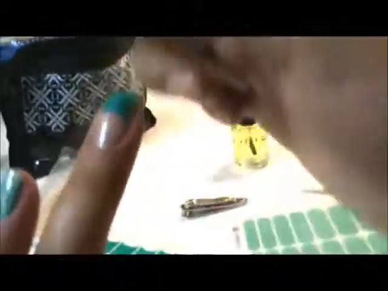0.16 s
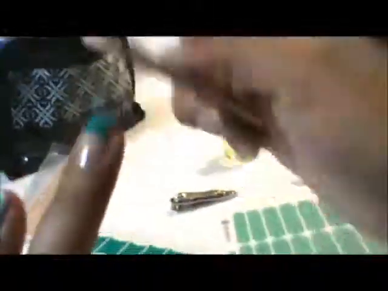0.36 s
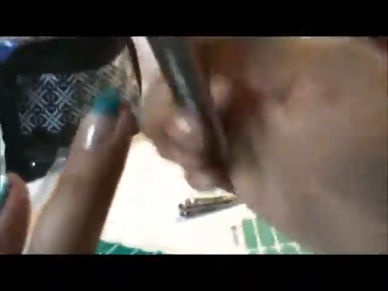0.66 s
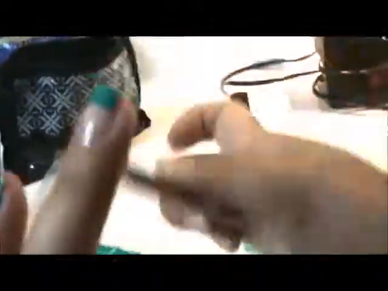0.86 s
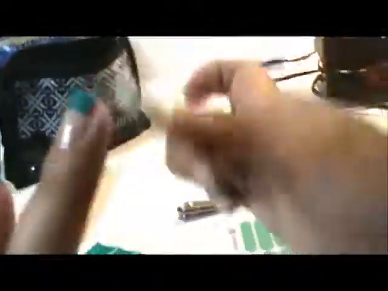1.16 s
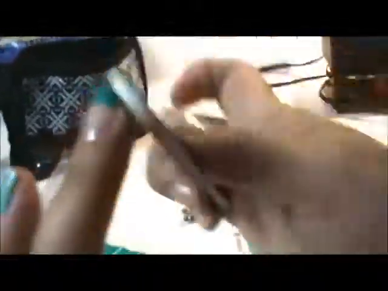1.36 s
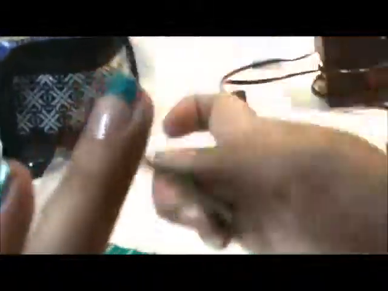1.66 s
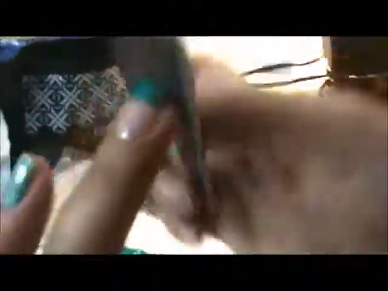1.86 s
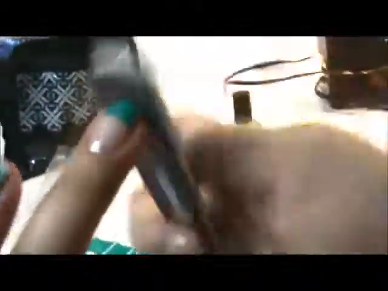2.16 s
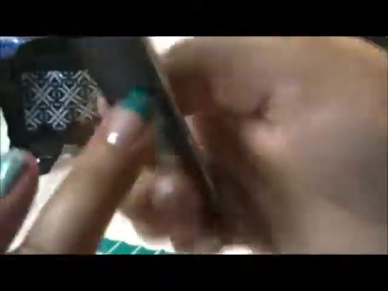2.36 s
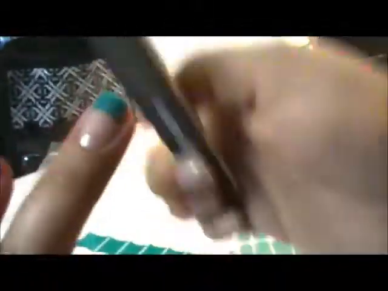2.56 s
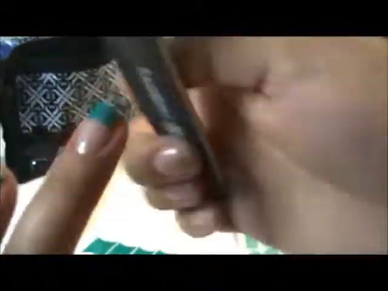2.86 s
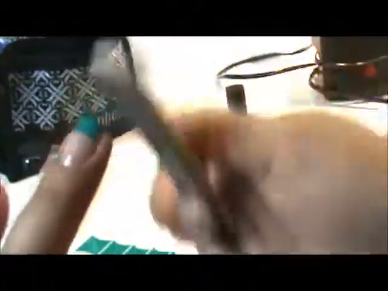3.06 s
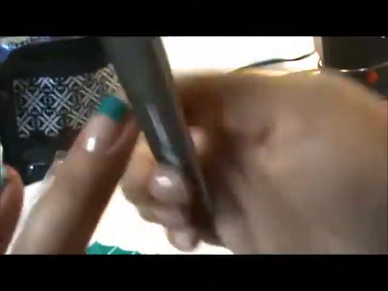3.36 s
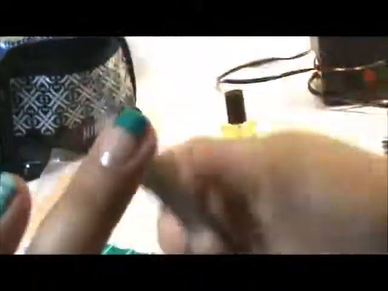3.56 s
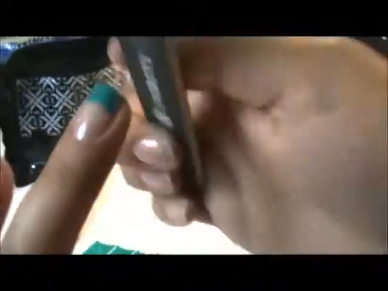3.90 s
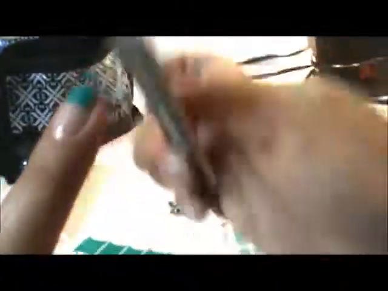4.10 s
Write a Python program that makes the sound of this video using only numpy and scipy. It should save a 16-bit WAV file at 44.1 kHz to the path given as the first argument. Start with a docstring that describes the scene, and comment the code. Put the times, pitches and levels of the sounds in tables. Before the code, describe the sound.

A nail file scrapes over a fingernail in sixteen short, evenly paced strokes, nearly four a second. Each begins with a soft knock on the fingertip, followed by a dry, gritty rasp with a quick rising chatter and tiny snags. Faint swishes come between strokes as the file draws back. The sound is close and in stereo, in a small room with a low hum.

```python
"""A small, humming room, where a nail file rasps over a fingernail in sixteen short strokes, close up in stereo.
Before each stroke the file knocks on the fingertip. It then sticks and slips over the nail edge, its chatter
rising in pitch as it gathers speed, while the grit rings the nail, flexes the blade and snags in tiny bursts.
Between strokes the hand draws the file back with a faint swish."""
import sys
import numpy as np
from scipy import signal
from scipy.fft import rfft, irfft, next_fast_len
from scipy.io import wavfile
from scipy.ndimage import map_coordinates

SR = 44100
rng = np.random.default_rng(int(sys.argv[2]) if len(sys.argv) > 2 else 0)


def wav_record(signal):
    """Record a signal, one row per channel, as 16-bit PCM in the file named by sys.argv[1]."""
    frames = np.transpose(np.atleast_2d(signal))
    bounded = np.clip(frames, -1, 1)
    # unit amplitude maps onto the largest positive 16-bit level
    quanta = np.round(bounded * 32767).astype(np.int16)
    wavfile.write(sys.argv[1], SR, quanta)


N = 186763

# tone of the room noise: freq_hz, gain_db
ROOM_TONE_EQ = [(15, -102), (25, 7.5), (55, -3.5), (140, -1), (331, -3), (509, -7), (631, -11), (919, -13),
                (1300, -22), (1950, -17.5), (2630, -24), (5880, -26), (6920, -26.5), (7500, -25.5),
                (15500, -36)]
# partials of the hum, with the background fader at -36 dB: pitch_hz, level_db
HUM_PARTIALS = [(123.8, -47), (172.3, -44.5), (263.8, -52.5), (360.7, -47.5)]
# fader ride on room noise and hum together: time_s, level_db
BACKGROUND_FADER = [(0, -39), (.5, -38.5), (1, -36.5), (1.9, -36), (2.15, -39), (2.4, -46), (3, -43.5),
                    (3.6, -41.5), (4.23, -40.5)]
# reverb time of the room: freq_hz, t60_s
ROOM_DECAY = [(150, 0.2), (1500, 0.22), (7000, 0.14), (15000, 0.039)]
# likeness of the two microphone ports: freq_hz, likeness_0_to_1
PORT_LIKENESS = [(200, 1), (650, 0.2), (1000, 0.081), (1700, 0.99), (2500, 0.048), (3000, 0.8), (5000, 1),
                 (7000, 1), (8000, 0.65), (10200, 0.71), (12500, 0.73)]
# stereo balance: freq_hz, left_over_right_db
PORT_BALANCE = [(300, -0.2), (800, 5.5), (1100, 0.5), (2200, 5), (2700, -2), (3300, 4), (4100, -0.5),
                (6000, 0.5), (8200, 2.5), (10300, 5.5), (13000, 1.5)]
# phase between the ports: freq_hz, left_lead_rad
PORT_PHASE = [(1000, 0.21), (2200, -0.48), (3500, 0.56), (6800, -0.65), (9800, -0.19), (10800, 0.31),
              (14000, -0.015)]
# the file brushing back, at times barely touching: time_s, level_db, band_centre_hz
BRUSH_CURVE = [(.53, -66, 9000), (.8, -47.5, 9400), (1.08, -44.5, 9800), (1.35, -55, 9500),
               (1.85, -47, 9700), (2.16, -50.5, 8000), (2.97, -49, 8040), (3.25, -64, 8400),
               (3.48, -46.5, 8200), (3.75, -49, 8500)]
# airy hiss of that brushing: freq_hz, gain_db
SWISH_EQ = [(1000, -16), (2000, 7), (4000, 4), (6800, 13), (8500, -6), (10500, -16), (12000, 2), (16000, 0)]
# the file landing on the fingertip: start_s, thump_peak_db, tick_gain_db
FINGERTIP_KNOCKS = [(0.0148, -14.5, -16), (.327, -23, -23), (.604, -12, -24), (0.879, -11, -20.5),
                    (1.1493, -12, -26.5), (1.4235, -13, -23.5), (1.69, -9.5, -20), (1.956, -8, -10),
                    (2.226, -11, -9.5), (2.4867, -19.5, -29), (2.764, -14.5, -14), (3.036, -21.5, -18),
                    (3.319, -20, -13.5), (3.5448, -14, -20), (3.8074, -16.5, -20), (4.0703, -17, -28)]
# tone of the nail's dry tick: freq_hz, gain_db
TICK_EQ = [(200, -5.5), (600, 8.5), (1000, 3), (1700, 2.5), (2600, -6), (6500, -6.5), (10000, -13.5),
           (16000, -21)]
# the grip drifting round the nail: time_s, flex_gain_db, ring_gain_db, fingertip_pitch_hz, release_s
GRIP_CURVE = [(.1, -5.5, -5, 176, 0.0073), (.9, -25, -3.5, 195, 0.0048), (2, -15.5, -2, 207, 0.0086),
              (2.3, -11, -5.5, 200, 0.011), (2.8, -10, -4, 216, 0.0058), (3.35, -17, -7.5, 260, 0.011),
              (4.15, -18, -3.5, 228, 0.0092)]
# grit catching on the nail edge: start_s, level_db, length_s, ring_hz, tug_peak_db
EDGE_SNAGS = [(.06, -12.5, 0.0042, 9400, -20), (.068, -14.5, 0.0047, 7000, -22),
              (.346, -34, 0.0034, 6140, -40), (0.6015, -21.5, 0.00097, 8850, -50),
              (0.903, -23.5, 0.0023, 6160, -25), (1.176, -21, 0.0038, 7000, -29),
              (1.244, -16, 0.0023, 7000, -28), (1.971, -19.5, 0.0041, 6600, -18),
              (1.979, -12.5, 0.0021, 6950, -16.5), (2.034, -13, 0.0017, 7200, -40),
              (2.595, -31, 0.002, 5030, -54), (2.868, -33, .0017, 4800, -50),
              (3.064, -26, 0.0052, 6200, -33), (3.078, -14.5, 0.0016, 6140, -25),
              (3.084, -11.5, 0.0021, 5260, -16.5), (4.088, -15.5, 0.0014, 6100, -40)]
# bright crunch of fracturing grit: freq_hz, gain_db
GRIT_EQ = [(200, -27), (600, -8), (1050, -4), (2500, -3), (3200, -0.5), (3900, -2.5), (5800, 0.5),
           (7700, -2), (8800, -3), (10200, -5), (11500, -1.5), (13500, -9.5), (16000, -15.5)]
# thump of the fingertip at each slip: freq_hz, gain_db
FINGER_EQ = [(40, -16), (110, 5), (200, 2.5), (400, -4), (680, -2), (1000, -11.5), (2000, 3), (5000, -58)]
# resonance of the rubbed fingertip: centre_hz, width_hz, gain_db
RUB_MODES = [(656, 750, 0)]
# resonances of the flexing blade: centre_hz, width_hz, gain_db
BLADE_MODES = [(1520, 400, 2), (2080, 1300, 3)]
# resonances of the ringing nail: centre_hz, width_hz, gain_db
NAIL_MODES = [(5450, 80, -39), (6280, 520, -17), (6827, 190, 0), (8280, 230, -14.5), (9150, 220, -12.5)]
# strokes of the file: start_s, stop_s, rasp_db, swell_db, chatter_db, chatter_peak_0_to_1, first_slip_hz
FILE_STROKES = [(0.061, 0.114, -21.5, -6.5, -28.5, 0.47, 149.3),
                (0.358, 0.43, -27, -11.5, -36, 0.51, 281.5), (0.629, 0.701, -23, 9, -33, .55, 229),
                (0.896, 0.963, -19.5, 5.5, -27.5, .42, 219), (1.172, 1.25, -23, 4, -30, 0, 217.2),
                (1.442, 1.518, -22, -2.5, -29, 0.03, 231.7), (1.701, 1.762, -16, 1.5, -24, 0.46, 263.8),
                (1.979, 2.041, -15, -16, -17, 0.11, 270.8), (2.248, 2.314, -22, -11, -26, 0.55, 180.6),
                (2.515, 2.582, -30, 1.5, -33, 0.3, 221), (2.79, 2.858, -27, -10.5, -30, 0.25, 231.7),
                (3.075, 3.143, -20.5, -6, -29, 0.73, 146.7), (3.323, 3.374, -19, -1, -21, 0.38, 278),
                (3.568, 3.638, -26, -7, -25.5, 0.04, 240.8), (3.826, 3.897, -25, -2.5, -23.5, 0.46, 273.6),
                (4.087, 4.162, -21, -13, -23.5, 0.24, 209)]


def amp(db):
    """Decibels to gain."""
    return 10 ** (np.asarray(db) / 20)


def unit(x):
    """Scale to rms 1."""
    return x / np.sqrt(np.mean(x ** 2) + 1e-20)


def along(points, hz):
    """Read (freq_hz, value) points on a log frequency axis."""
    freqs, values = np.transpose(points)
    return np.interp(np.log(hz + 1), np.log(freqs + 1), values)


def at(curve, s):
    """The columns of a slow curve at time s."""
    times, *columns = np.transpose(curve)
    return [np.interp(s, times, column) for column in columns]


def wobble(rate, size):
    """A smooth random curve, rate knots a second."""
    knots = rng.standard_normal(int(size * rate / SR) + 4)
    return map_coordinates(knots, [np.arange(size) * rate / SR])


def filtered(x, response):
    """Run x through a complex frequency response."""
    n = x.shape[-1]
    padded = 2 * next_fast_len(n)
    return irfft(rfft(x, padded) * response(np.fft.rfftfreq(padded, 1 / SR)), padded)[..., :n]


def colour(points):
    """A minimum-phase EQ through (freq_hz, gain_db) points."""
    def response(hz):
        cepstrum = irfft(np.log(amp(along(points, hz))))
        half = len(cepstrum) // 2
        return np.exp(rfft(np.r_[cepstrum[0], 2 * cepstrum[1:half], np.zeros(half)]))
    return response


def resonate(x, modes, passes=1):
    """Ring damped resonances with x, at rms 1; a second pass steepens their skirts."""
    def response(f):
        return sum(amp(db) * 1j * f * width / (hz * hz - f * f + 1j * f * width)
                   for hz, width, db in modes)
    for _ in range(passes):
        x = filtered(x, response)
    return unit(x)


def add(track, s, sound):
    """Mix a sound into the track at time s."""
    part = track[..., max(round(s * SR), 0):][..., :sound.shape[-1]]
    part += sound[..., :part.shape[-1]]


def background(low_cut_hz=24):
    """A bed of low room noise, nearly mono in the bass, with a wavering hum."""
    t = np.arange(N) / SR
    fader = amp(at(BACKGROUND_FADER, t)[0])
    noise = rng.standard_normal((2, N))
    mid, side = filtered(noise, lambda hz: colour(ROOM_TONE_EQ)(hz) * (1j * hz / (1j * hz + low_cut_hz)) ** 2)
    side = filtered(side, lambda hz: amp(along([(60, -23), (200, -14), (600, -5), (3000, -1.5)], hz)))
    hum = sum(amp(db + 36 + 3.1 * wobble(10, N)) * np.sin(2 * np.pi * hz * t + 0.81 * wobble(14, N))
              for hz, db in HUM_PARTIALS)
    return fader * (0.92 * unit(np.array([mid + side, mid - side])) + np.sqrt(2) * hum)


def room_reverb(x):
    """A short tail that dies sooner in the treble."""
    hz, t, spectrum = signal.stft(rng.standard_normal((2, SR // 3)), SR, nperseg=256)
    decay = amp(-60 * t / along(ROOM_DECAY, hz)[:, None])
    tail = signal.istft(spectrum * decay, SR, nperseg=256)[1]
    return signal.fftconvolve(x, tail / np.linalg.norm(tail[0]), axes=1)[:, :N]


def microphone_ports(straight, scattered):
    """Hands and table scatter the sound, so each port hears its own colour."""
    def spread(hz):
        return np.arccos(np.sqrt(np.clip(along(PORT_LIKENESS, hz), 0, 1))) / 2

    def pan(hz):
        return amp(sides * along(PORT_BALANCE, hz) / 2) * np.exp(1j * sides * along(PORT_PHASE, hz) / 2)
    sides = np.array([[1], [-1]])
    mid = filtered(straight, lambda hz: np.cos(spread(hz)))
    side = filtered(scattered, lambda hz: np.sin(spread(hz)))
    return filtered(mid + sides * side, pan)


def grit(samples, spread_db):
    """Tiny uneven crackles of grit, their strength limited so none spikes out; rows: straight, scattered."""
    strength = np.minimum(rng.standard_normal((2, samples)), 1.7)
    return unit(rng.standard_normal((2, samples)) * amp(spread_db * strength))


def back_swishes(lead_s=0.057, sigma_s=0.024, width_hz=3400):
    """A faint brushing as the hand draws the file back, peaking lead_s before the next knock."""
    out, t = np.zeros((2, N)), np.arange(SR // 4) / SR
    middle = t[-1] / 2
    swell = np.exp(-.5 * ((t - middle) / sigma_s) ** 2)
    for knock_s, *_ in FINGERTIP_KNOCKS[1:]:
        peak_s = knock_s - lead_s
        db, hz = at(BRUSH_CURVE, peak_s)
        force = grit(len(t), spread_db=4)
        band = amp(-2) * resonate(force, [(hz, width_hz, 0)], passes=2)
        hiss = amp(-3) * unit(filtered(force, colour(SWISH_EQ)))
        add(out, peak_s - middle, amp(db) * swell * (band + hiss))
    return out


def tug(t, hz, t60_s=0.019, rise_s=0.0014):
    """The soft fingertip swings for a few cycles after a push; peak 1."""
    swing = -np.sin(2 * np.pi * hz * t) * (1 - np.exp(-t / rise_s)) * amp(-60 * t / t60_s)
    return swing / np.abs(swing).max()


def knocks(tick_t60_s=0.0063):
    """The file lands: the fingertip gives and the hard nail adds a dry tick."""
    out, t = np.zeros(N), np.arange(SR // 20) / SR
    for s, thump_db, tick_db in FINGERTIP_KNOCKS:
        _, _, fingertip_hz, _ = at(GRIP_CURVE, s)
        tick = filtered(rng.standard_normal(len(t)) * amp(-60 * t / tick_t60_s), colour(TICK_EQ))
        add(out, s, amp(thump_db) * tug(t, fingertip_hz) + amp(tick_db + 1.5) * tick / np.abs(tick).max())
    return out


def pressure_db(progress, db, swell_db, arch_db=3.5, edge=.13):
    """The hand presses in an arch that leans towards the start or the end of the stroke."""
    from_middle = np.clip(progress, edge, 1 - edge) - .5
    return db + swell_db * from_middle - arch_db * (2 * from_middle) ** 2


def closing_snags(lead_s=0.004, length_s=0.0017, ring_hz=6650):
    """Each stroke ends in a small snag that follows the pressure left; rows as in EDGE_SNAGS."""
    for _, stop, rasp_db, swell_db, *_ in FILE_STROKES:
        end_db = pressure_db(1, rasp_db, swell_db)
        yield stop - lead_s, end_db - 0.5, length_s, ring_hz, end_db - 10


def snags(width_hz=1000, tug_hz=180, release_s=0.00023):
    """Short, dense bursts of grit where the file catches and tugs at the finger."""
    out, t = np.zeros((2, N)), np.arange(SR // 40) / SR
    for s, db, length_s, ring_hz, tug_db in [*EDGE_SNAGS, *closing_snags()]:
        gate = np.exp(-np.maximum(t - length_s, 0) / release_s)
        force = gate * grit(len(t), spread_db=7)
        crunch = 0.39 * unit(filtered(force, colour(GRIT_EQ)))
        ring = amp(-4) * resonate(force, [(ring_hz, width_hz, 0)])
        add(out, s, amp(db) * np.sqrt(np.mean(gate ** 2)) * (crunch + ring))
        add(out[0], s, amp(tug_db) * tug(t, tug_hz))
    return out


def stick_slip(t, length_s, first_hz, top_hz):
    """The file slips over the nail edge: regular at first, faster and looser as it gathers speed."""
    speed = np.clip(t / (.8 * length_s), 0, 1) ** 1.4
    rate_hz = first_hz + (top_hz - first_hz) * speed
    jitter = (.05 + .23 * speed) * wobble(380, len(t))
    cycles = np.cumsum(rate_hz) / SR + jitter
    strength = amp(3 * wobble(197.7, len(t)))
    new_cycle = np.diff(np.floor(np.maximum.accumulate(cycles)), prepend=-1) > 0
    slips = new_cycle * strength / np.sqrt(rate_hz)
    swing = strength * np.sin(2 * np.pi * cycles)
    return slips, swing, speed


def fingertip_chatter(slips, swing, speed, force):
    """Slips thump and swing the fingertip; with speed the swing eases and a dull rubbing comes up."""
    thumps = amp(-6) * unit(filtered(slips, colour(FINGER_EQ)))
    tone = amp(-1.73 - 1.9 * speed) * unit(swing)
    rub = amp(-8) * speed * resonate(force, RUB_MODES, passes=2)
    return thumps + tone + rub


def sliding_contact(x, progress, ripple_db=2.5):
    """The contact moves along the blade, so the peaks and dips of its tone shift during a stroke."""
    freqs = np.arange(1100, 16000, 300)
    out = np.zeros_like(x)
    for place in (0, .5, 1):
        gains_db = ripple_db * rng.standard_normal(len(freqs)) * (freqs > freqs[0])
        crossfade = np.clip(1 - 2 * np.abs(progress - place), 0, 1)
        out += crossfade * filtered(x, colour(np.c_[freqs, gains_db]))
    return out


def rasp(force, progress, flex_db, ring_db, shift_db=11):
    """Fractures crunch, flex the blade and ring the nail; along the stroke flex gives way to ring."""
    tilt_db = shift_db * (progress - .5)
    crunch = 0.87 * unit(filtered(force, colour(GRIT_EQ)))
    flex = amp(flex_db - tilt_db - 5) * resonate(force, BLADE_MODES, passes=2)
    ring = amp(ring_db + tilt_db - 5) * resonate(force, NAIL_MODES)
    return sliding_contact(crunch + flex, progress) + ring


def file_strokes(attack_s=0.0063, puff_decay_s=0.00098, chatter_arch_db=24.5):
    """Every slip of the file swings the fingertip and breaks off a puff of grit."""
    out, t = np.zeros((2, N)), np.arange(SR // 7) / SR
    for start, stop, rasp_db, swell_db, chatter_db, chatter_peak, first_hz in FILE_STROKES:
        length_s = stop - start
        progress = np.minimum(t / length_s, 1)
        flex_db, ring_db, _, release_s = at(GRIP_CURVE, start)
        contact = (1 - np.exp(-t / attack_s)) * np.exp(-np.maximum(t - length_s, 0) / release_s)
        top_hz = 656.9 + 15 * (rasp_db + 21)  # harder strokes are faster
        slips, swing, speed = stick_slip(t, length_s, first_hz, top_hz)
        puffs = signal.lfilter([1], [1, -np.exp(-1 / (puff_decay_s * SR))], slips)
        pulse_depth = np.clip(0.77 * (1 - 1.08 * speed), 0, 1)  # fast slips run together
        force = (1 - pulse_depth + pulse_depth * unit(puffs)) * grit(len(t), spread_db=6)
        scrape = rasp(force, progress, flex_db, ring_db)
        shelf_db = 0.27 * (rasp_db + 11)  # harder pressure breaks sharper chips
        scrape = filtered(scrape, lambda hz: amp(along([(8000, 0), (15000, shelf_db)], hz)))
        scrape_gain = amp(pressure_db(progress, rasp_db, swell_db) + wobble(204, len(t)))
        chatter = fingertip_chatter(slips, swing, speed, force[0])
        chatter_gain = amp(chatter_db - chatter_arch_db * (progress - chatter_peak) ** 2)
        add(out, start, contact * scrape_gain * scrape)
        add(out[0], start, contact * chatter_gain * chatter)
    return out


def scene():
    """Close filing with a touch of reverb, over the room's bed of noise and hum."""
    straight, scattered = file_strokes() + snags() + back_swishes()
    filing = microphone_ports(straight + knocks(), scattered)
    return filing + amp(-13.5) * room_reverb(filing) + background()


def record(dry, low_cut_hz=45, ceiling=0.85, high_cut_hz=15900):
    """The recorder sheds the deepest bass, rounds the tallest peaks and cuts the top off steeply."""
    x = filtered(dry, lambda hz: 1j * hz / (1j * hz + low_cut_hz))
    x = x / (1 + (x / ceiling) ** 6) ** (1 / 6)
    return filtered(x, lambda hz: 1 / (1 + (hz / high_cut_hz) ** 160))


dry = scene()
out = record(dry)
wav_record(out)
```